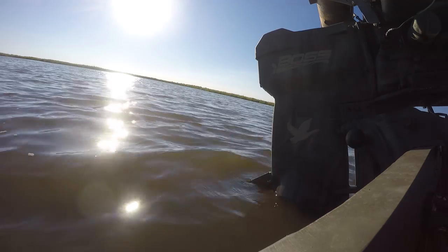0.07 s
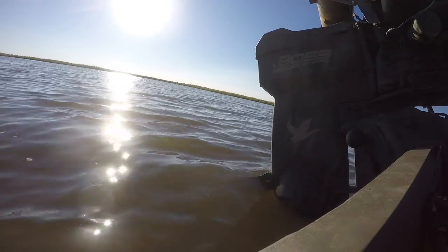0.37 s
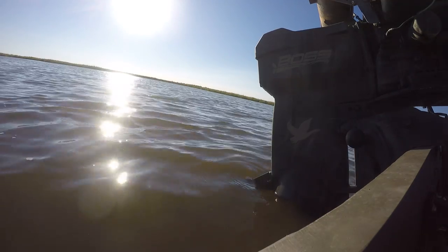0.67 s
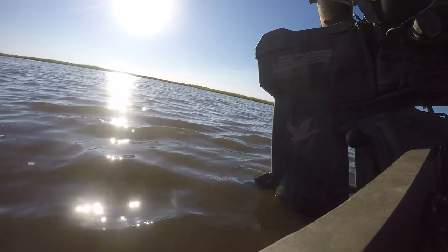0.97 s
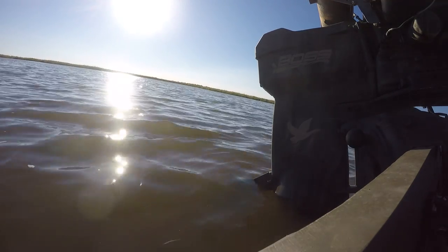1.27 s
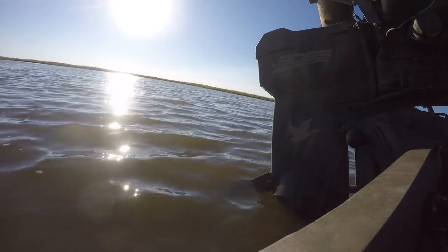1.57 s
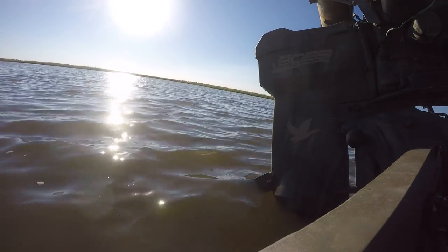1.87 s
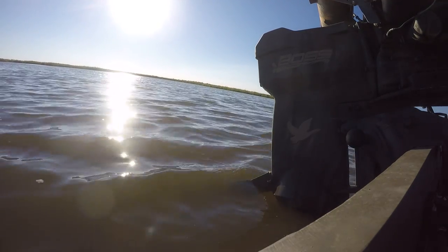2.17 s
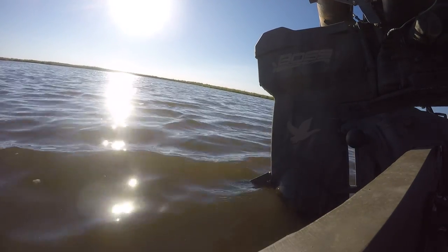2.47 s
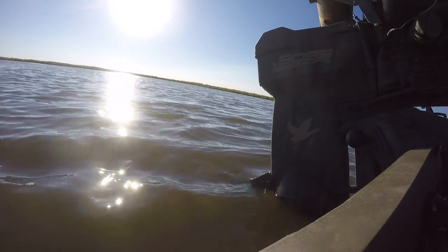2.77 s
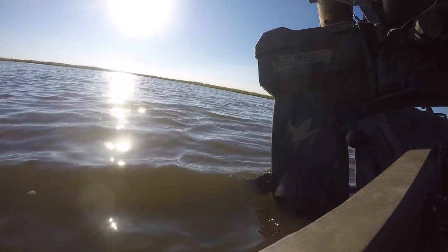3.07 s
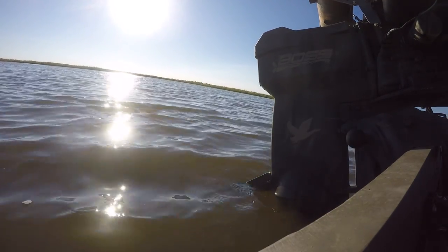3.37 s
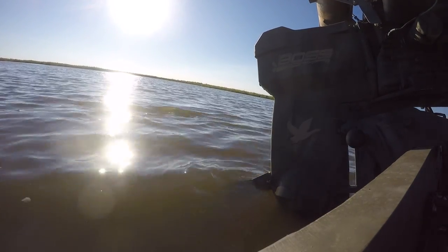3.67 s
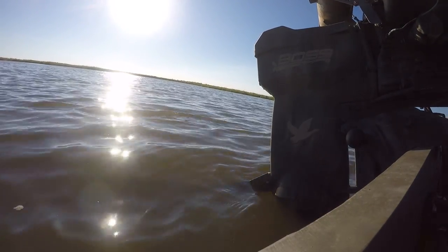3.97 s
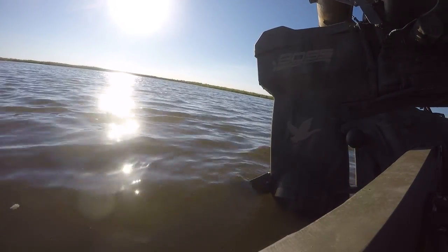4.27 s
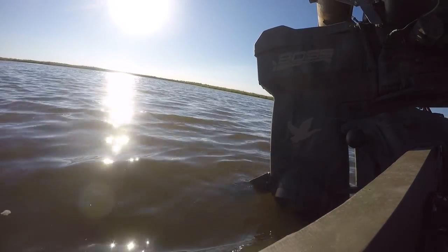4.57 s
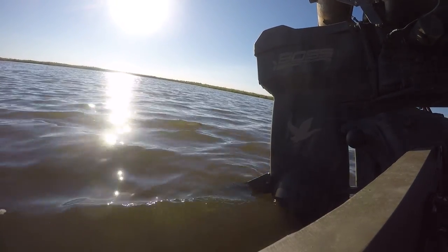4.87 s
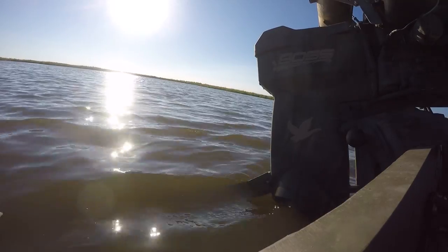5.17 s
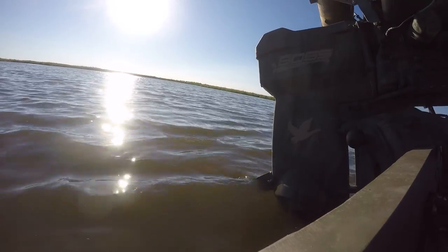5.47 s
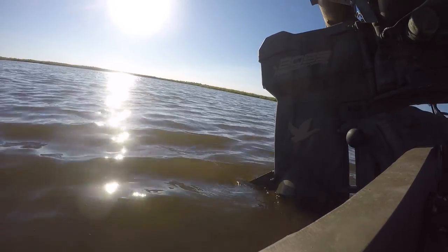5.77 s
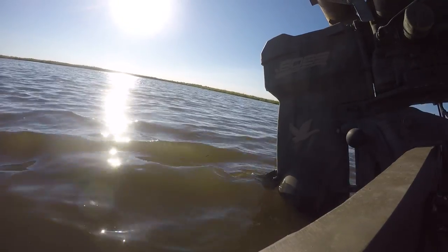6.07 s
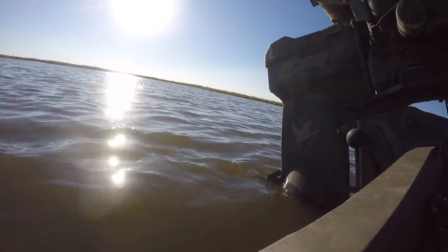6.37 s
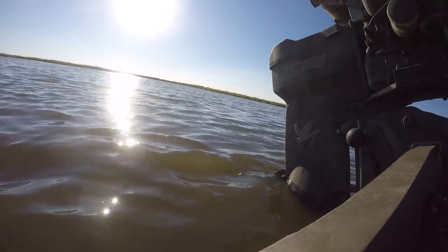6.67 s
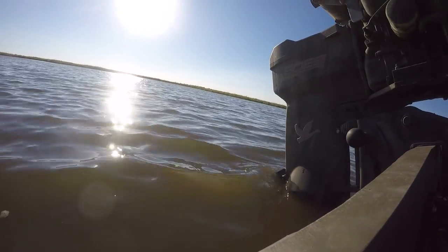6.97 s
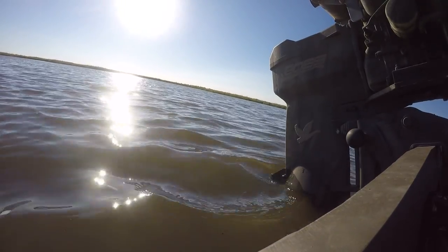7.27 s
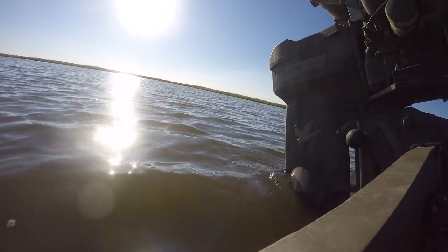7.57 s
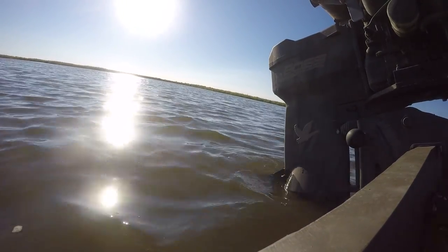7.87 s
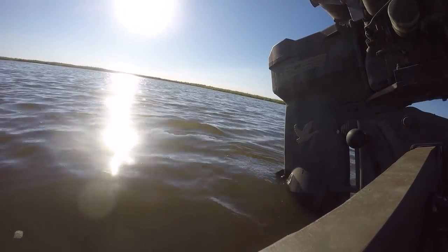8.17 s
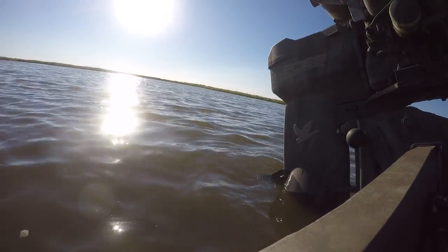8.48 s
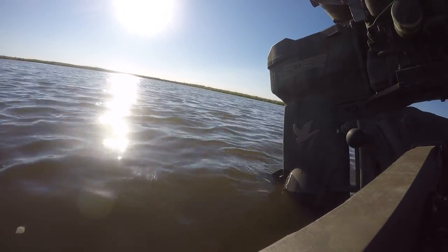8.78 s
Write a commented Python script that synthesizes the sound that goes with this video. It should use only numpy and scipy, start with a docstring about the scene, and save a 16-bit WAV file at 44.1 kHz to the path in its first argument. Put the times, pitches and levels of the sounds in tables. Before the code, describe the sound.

A small boat's motor cranks after a few clicks, catches, and idles with an uneven, booming, clattering chug.

```python
"""A V-twin mud motor starts up on a small boat in choppy water, heard from close by.
Over a low rumble, a switch and a lever click, with soft rubbing between. At 2.5 s the starter
bangs in and grinds round the flywheel for a second. At 3.6 s the engine catches and flares,
then idles in uneven double beats: a shaking boom, a ringing clatter, chirps of loose metal
and two exhaust chuffs a cycle, from 6.5 s on now and then a missed one."""
import sys
import numpy as np
from scipy import signal
from scipy.fft import rfft, irfft
from scipy.io import wavfile

SR = 44100
rng = np.random.default_rng(int(sys.argv[2]) if len(sys.argv) > 2 else 0)


def generate_wav(sig):
    """Save sig (samples, or channels by samples) to the path in sys.argv[1] as 16-bit PCM at SR."""
    pcm = np.round(np.clip(np.atleast_2d(sig).T, -1, 1) * 32767).astype(np.int16)
    wavfile.write(sys.argv[1], SR, pcm)


N = 397341
T = np.arange(N) / SR
ENGAGE_S, CATCH_S, RELEASE_S = 2.485, 3.575, 3.585  # starter meshes, engine catches, starter lets go

# resonances of engine, frame and hull: f/Hz, width/Hz, boost/dB
FRAME_MODES = [(449.7, 19, 16.5), (489, 21, 16), (710, 10, 4.5), (1002, 82, 7), (1183.5, 31, 9),
               (1529, 21, 9.5), (1651, 23, 9.5), (1723, 67, 6), (2242, 26, 12), (2416, 113, 9.5),
               (3555, 30, 10.5)]
# ring of the flywheel: f/Hz, width/Hz, boost/dB
FLYWHEEL_MODES = [(467, 43, 11), (544, 33, 5.5), (725, 18, 10), (1017, 49, 12.5), (1180, 45, 3.5),
                  (1476, 44, 3), (1613, 17, 12.5), (2270, 87, 7.5), (2430, 36, 13), (3400, 120, 3),
                  (4300, 41, 13)]
# spectrum of a heavy, dull blow: f/Hz, level/dB
BANG_EQ = [(40, -17), (110, 2), (200, 9), (330, 0), (470, 1), (700, -18), (1100, -7.5), (2300, -17),
           (4000, -43), (5500, -32), (6700, -26), (14000, -57)]
# blows of the starter pinion taking up the load: t/s, level/dB, decay/s
PINION_BLOWS = [(2.49, -5, 0.011), (2.516, -15.5, 0.04), (2.56, -15, 0.041), (2.605, -27, .05)]
# compression strokes that load the starter: t/s, extra grind/dB, dip of the hiss just after/dB
COMPRESSIONS = [(2.656, 7.002, 5), (2.789, 7.5, 12), (2.956, 8.002, 4), (3.058, 8.502, 15), (3.216, 8, 11),
                (3.308, 8, 2), (3.465, 7.5, 13), (3.58, 6, 3)]
# missed firings: t/s, loss of chuff/dB
MISSED_FIRINGS = [(6.55, 19), (7.04, 10), (7.16, 7), (7.41, 23), (7.65, 20), (8.38, 17), (8.63, 20),
                  (8.75, 10)]


def gain_of(db):
    """Decibels to amplitude."""
    return 10 ** (np.asarray(db) / 20)


def unit_rms(x):
    """Scales to rms 1."""
    return x / np.sqrt(np.mean(x ** 2) + 1e-20)


def curves(rows):
    """One automation curve for each column after the time."""
    s, *columns = np.transpose(rows)
    return [np.interp(T, s, c) for c in columns]


def hump(s, width):
    """A smooth rise and fall of height 1 around a moment."""
    return np.exp(-np.minimum(((T - s) / width) ** 2, 100))


def drift(hz, size=4096):
    """Random wander of rms 1, rolling off above the given rate."""
    rolloff = 1 + (np.fft.rfftfreq(size, T[-1] / size) / hz) ** 4
    slow = irfft(rfft(rng.standard_normal(size)) / rolloff)
    return np.interp(T, np.linspace(0, T[-1], size), unit_rms(slow))


def colour(x, eq, modes=(), size=8192):
    """Rings x through a body of unit energy: a broad EQ (f/Hz, level/dB) with resonances on top."""
    hz = np.fft.rfftfreq(size, 1 / SR)
    f, db = np.transpose(eq)
    gain = gain_of(np.interp(np.log(hz + 1), np.log(f), db)) * hz / np.hypot(hz, 20)
    peaks = sum((gain_of(boost) ** 2 - 1).clip(0) / (1 + (2 * (hz - centre) / width) ** 2)
                for centre, width, boost in modes)
    # minimum phase: the ring follows the hit
    cepstrum = irfft(np.log(gain * np.sqrt(1 + peaks) + 1e-6))
    cepstrum[1:size // 2] *= 2
    cepstrum[size // 2 + 1:] = 0
    ring = irfft(np.exp(rfft(cepstrum)))
    return signal.oaconvolve(x, ring / np.linalg.norm(ring))[:N]


def rattle(per_s, spread_db):
    """A stream of tiny impacts of uneven size, rms 1."""
    out = np.zeros(N)
    at = np.flatnonzero(rng.random(N) < per_s / SR)
    chance = rng.uniform(-1, 1, N)[at]
    out[at] = np.sign(chance) * gain_of(spread_db * np.minimum(-np.log(abs(chance)), 3))
    return unit_rms(out)


def bursts(times, dbs, rise, decay):
    """Envelope of hits, each with a linear attack and an exponential tail."""
    power = np.zeros(N)
    t = np.arange(SR // 4) / SR
    for s, db, fall in zip(times, dbs, decay * np.ones(len(times))):
        shape = np.minimum(t / rise, 1) * np.exp(-np.maximum(t - rise, 0) / fall)
        part = power[round(s * SR):][:len(t)]
        part += (gain_of(db) * shape[:len(part)]) ** 2
    return np.sqrt(power)


def water(onset_s=0.084):
    """A low bed of wind and small waves around the hull, with faint laps."""
    # swell of the rumble, with a lull before the start: t/s, level/dB
    swell = [(.1, -35), (.3, -33), (.7, -34.5), (1.3, -34.5), (1.75, -33.5), (2.15, -36), (2.45, -36)]
    # spectrum of the rumble: f/Hz, level/dB
    rumble_eq = [(12, -63), (20, -14), (43, 0), (53, -21.5), (64, -16), (124, -27), (155, -17.5),
                 (235, -31), (310, -30), (387, -42.5), (484, -35.5), (603, -53.5), (4430, -59.5),
                 (4950, -60.5), (15000, -73.5)]
    rumble = gain_of(curves(swell)[0] + 1.3 * drift(11)) * colour(rng.standard_normal(N), rumble_eq)
    lapping = gain_of(-67 + 1.8 * drift(11)) * rattle(700, 3)
    laps = colour(lapping, [(400, -19), (1000, 5), (2300, 6), (3200, -14), (8000, -25)])
    return np.clip((T - onset_s) / 0.0096, 0, 1) * (rumble + laps)


def swishes():
    """Soft, grainy rubbing that swells and fades."""
    # rubs before the start: middle t/s, length/s, level/dB
    rubs = [(.85, 0.078, -67), (1.042, 0.074, -61), (1.766, 0.37, -55)]
    rub_eq = [(500, -22), (1000, -1), (1800, 4), (2400, 3), (3000, -17), (4000, -13), (8000, -32)]
    level = sum(gain_of(db) / (1 + (2 * (T - s) / length) ** 8) for s, length, db in rubs)
    return colour(level * rattle(4000, 2.2), rub_eq)


def controls():
    """Bright switch snaps and duller latch clacks, each with a faint ring in the frame."""
    # clicks of switch and lever: t/s, level/dB, decay/s, dull share/0-1
    clicks = [(0.2346, -20.5, 0.0026, 0), (0.277, -39, 0.011, 0.1), (0.297, -36, 0.0066, 0.1),
              (0.305, -29, 0.0063, 0.3), (0.312, -30, 0.0078, 0), (0.349, -27, 0.0025, 0.44),
              (0.459, -43, 0.0053, 0.8), (1.321, -51, 0.0073, 0.8), (1.422, -44.5, 0.015, 1),
              (2.1218, -35, 0.0092, 0.74), (2.2475, -39.5, 0.0085, 1), (2.291, -30, 0.0072, 1),
              (2.307, -33.5, 0.015, 1), (2.35, -47, 0.02, 1), (2.461, -39, 0.054, 0.94),
              (2.4737, -16, 0.0096, 0.5), (2.480, -12, 0.01, 0.8)]
    # spectrum of the switch: f/Hz, level/dB
    switch_eq = [(300, -28), (500, -8), (1000, -12), (1650, -3), (2300, 5), (3000, -4), (4050, -1),
                 (6000, -19.5), (6860, -10), (7700, -19), (11000, -23), (15000, -33)]
    # spectrum of the latch: f/Hz, level/dB
    latch_eq = [(290, -10), (500, -26), (998, -10), (1170, -9.5), (1750, -7), (1990, -39), (2340, -6.5),
                (2930, -25), (3770, -13), (4550, -44), (12000, -62), (15600, -87), (22000, -120)]
    s, db, decay, dull = np.transpose(clicks)
    clean = np.exp(-(decay / 0.0071) ** 2)  # short clicks are one clean impact, longer ones scrape
    out = np.zeros(N)
    for share, eq in ((1 - dull, switch_eq), (dull, latch_eq)):
        level_db = db + 10 * np.log10(np.clip(share, 1e-4, 1))
        scrape_db = level_db + 10 * np.log10(1.001 - clean)
        force = bursts(s, scrape_db, .0003, decay) * rng.standard_normal(N)
        force[np.round(s * SR).astype(int)] += gain_of(level_db) * np.sqrt(clean * decay * SR / 2)
        out += colour(force, eq)
    ring = bursts(s, db - 20 + 10 * np.log10(decay / 0.0046), 0.00094, 0.022) * rng.standard_normal(N)
    ring_eq = [(150, 5), (450, -4), (900, -2), (2400, 3), (4000, -6), (9000, -23)]
    return out + colour(ring, ring_eq, FRAME_MODES)


def lever_bumps():
    """The lever thuds into the hull, and its first push sets the mount swaying."""
    # bumps against the hull: t/s, level/dB, decay/s
    bumps = [(0.306, -27.5, 0.003), (0.349, -47, 0.011), (0.459, -44, .012), (2.124, -49, 0.0073)]
    s, db, decay = np.transpose(bumps)
    thud = colour(bursts(s, db, 0.00099, decay) * rng.standard_normal(N), BANG_EQ, FRAME_MODES)
    sway = bursts([0.235], [-22], 0.023, 0.11) * np.sin(2 * np.pi * 39 * T)
    return thud + sway


def coasting():
    """A faint, rough tone rises a little and sinks away, likely the freed starter running down."""
    # glide of the tone: t/s, f/Hz, level/dB
    glide = [(3.6, 290.6, -40.5), (3.95, 299, -32.5), (4.45, 335, -34.5), (4.8, 300.6, -34),
             (6.0, 267, -39.5), (7.0, 253, -80)]
    hz, db = curves(glide)
    turns = np.cumsum(hz * (1 + .045 * drift(60))) / SR
    return (T > CATCH_S) * gain_of(db + 3 * drift(40)) * np.sin(2 * np.pi * turns)


def chirps(faint_from_s=5.6, repeats=4):
    """Loose metal rubs and sings for a moment, its pitch wavering."""
    # the loudest chirps: t/s, f/Hz, level/dB
    loud = [(3.597, 3670, -19), (3.698, 3250, -31), (3.748, 4000, -30), (3.868, 3850, -23),
            (3.972, 4000, -33), (4.033, 3460, -27), (4.18, 4000, -27.5), (4.242, 4300, -28.5),
            (7.23, 4800, -34), (7.283, 3710, -25)]
    # faint squeaks scattered over the idle: f/Hz, level/dB
    squeaks = [(4800, -42.5), (6550, -41.5)]
    out = np.zeros(N)
    wavering_t = T + 0.0125 * np.cumsum(drift(226)) / SR
    faint = [(s, hz, db) for hz, db in squeaks for s in rng.uniform(faint_from_s, T[-1], repeats)]
    for s, hz, db in loud + faint:
        out += gain_of(db) * hump(s, .013) * np.sin(2 * np.pi * hz * wavering_t)
    return out


def brush_hiss(engaged, speed, teeth, db_per_octave=27):
    """The starter's brushes hiss with speed, ducking as the flywheel runs ahead past each compression."""
    # spectrum of the brushes: f/Hz, level/dB
    brush_eq = [(2500, 4), (4300, 2.5), (5600, -7.5), (6550, 7), (7400, -6.5), (8600, -8.5), (10000, -16.5),
                (11200, -11), (11900, -19), (14500, -36), (15500, -48)]
    duck_db = sum(dip_db * hump(s + 0.022, 0.014) for s, _, dip_db in COMPRESSIONS)
    hiss_db = -30 + db_per_octave * np.log2(speed) - duck_db + 2.4 * drift(54)
    scrape = bursts([PINION_BLOWS[0][0]], [-19], .004, 0.0057)
    grain = rattle(5000, 2.2) + 0.34 * teeth
    return colour((engaged * gain_of(hiss_db) + scrape) * grain, brush_eq)


def pinion_bang():
    """The pinion slams into mesh and rings the flywheel."""
    s, db, decay = np.transpose(PINION_BLOWS)
    return colour(bursts(s, db, 0.004, decay) * rattle(3140, 2.2), BANG_EQ, FLYWHEEL_MODES)


def starter(start_hz=371, top_hz=751, spin_up_s=.15, strain_hz=680):
    """The pinion's teeth grind and whine round the flywheel, harder on each compression."""
    # spectrum of the gears: f/Hz, level/dB
    gear_eq = [(40, -13), (150, 7.5), (380, -1.5), (470, 4.5), (620, -8.5), (1300, 1.5), (2000, -5.5),
               (2450, -7.5), (2950, -17), (3800, -7), (5400, -61), (9000, -87)]
    since = np.maximum(T - ENGAGE_S, 0)
    engaged = np.minimum(since / 0.0055, 1) * np.exp(-np.maximum(T - RELEASE_S, 0) / 0.028)
    level = engaged * gain_of(-21 + 6 * np.exp(-since / 0.17))  # louder while it spins up
    load_db = sum(db * hump(s, .017) for s, db, _ in COMPRESSIONS)
    tooth_hz = top_hz + (start_hz - top_hz) * np.exp(-since / spin_up_s)
    tooth_count = np.cumsum(tooth_hz * (1 + .03 * drift(25))) / SR
    tooth_count += .07 * drift(220)  # play makes each tooth land a little early or late
    teeth = unit_rms(np.diff(np.floor(tooth_count), prepend=0) * (1 + 0.68 * drift(220)))
    grind = gain_of(-3.5) * teeth + gain_of(-2.7) * rattle(1700, 4)
    strain_band = signal.butter(2, [strain_hz, 3 * strain_hz], "bandpass", fs=SR, output="sos")
    strain = (gain_of(load_db) - 1) * signal.sosfilt(strain_band, grind + 0.32 * teeth)
    gears = colour(level * gain_of(2.1 * drift(57)) * (grind + strain), gear_eq, FLYWHEEL_MODES)
    brushes = brush_hiss(engaged, tooth_hz / top_hz, teeth)
    bang = pinion_bang()
    rocking_eq = [(15, -10), (30, -0.5), (45, -1.5), (60, -15), (90, -10.5), (140, -41), (400, -68)]
    rocking = level * gain_of(-3.5) * colour(rng.standard_normal(N), rocking_eq)
    whine = level * gain_of(-18.5 + 2.1 * load_db + 2.8 * drift(25)) * np.sin(2 * np.pi * tooth_count)
    return gears + whine + brushes + bang + rocking


def firings(cycles, v_lag=.385, flare_db=10, flare_s=0.46):
    """Two uneven firings a cycle: when each exhaust valve opens, and relative knock and chuff levels."""
    # how hard the firings knock: t/s, relative level/dB
    effort = [(3.58, -18), (3.7, -11), (3.9, -12), (4.25, -18), (4.8, -17), (5.15, -20), (5.6, -18),
              (6.6, -20.5), (6.92, -14), (7.1, -19), (7.4, -14.5), (7.7, -17), (8.15, -15), (8.68, -19),
              (8.95, -13.5)]
    whole = np.arange(int(cycles[-1]) + 1)
    places = np.sort(np.r_[whole, whole + v_lag])[1:]  # in cycles; the second cylinder starts
    opens = np.interp(places[places < cycles[-1]], cycles, T)
    knock_scatter, chuff_scatter = rng.standard_normal((len(opens), 2)).T
    knock_db = np.interp(opens, *np.transpose(effort)) + 1.4 * knock_scatter
    rich = np.exp(-((opens - CATCH_S) / flare_s) ** 2)  # the first, rich firings chuff louder
    chuff_db = -40 + flare_db * rich + 1.03 * chuff_scatter
    for s, loss_db in MISSED_FIRINGS:
        chuff_db[np.argmin(abs(opens - s))] -= loss_db
    return opens, knock_db, chuff_db


def jingle(shaking, parts=12):
    """Small loose parts, each with its own pitch, ping at random while the engine shakes them."""
    t = np.arange(SR // 24) / SR
    out = np.zeros(N + len(t))
    for hz in np.geomspace(3300, 4250, parts):
        ping = np.sin(2 * np.pi * hz * t) * np.exp(-t / .006)
        for at in rng.integers(0, N, size=220):
            out[at:at + len(t)] += shaking[at] * rng.standard_normal() * ping
    return unit_rms(out[:N])


def frame_clatter(opens, knock_db, running, knock_lead_s=0.028):
    """Each firing knocks the frame and sets the hull humming; valve gear and loose parts rattle along."""
    # hard clanks of the mount as the engine rocks: t/s, level/dB, decay/s
    mount_hits = [(3.598, -16, 0.023), (3.797, -14, 0.006), (3.838, -15, 0.0096), (4.217, -15, 0.0062),
                  (4.653, -22, 0.0047), (5.06, -20, 0.0037), (6.587, -16.5, 0.0082), (6.648, -20, 0.0077),
                  (7.275, -20.5, 0.0099), (7.323, -15, 0.015), (7.443, -16, .006), (7.522, -14, 0.013),
                  (7.683, -17, 0.0082), (7.746, -19.5, 0.007), (8.052, -14, 0.0072), (8.178, -8.5, 0.0051),
                  (8.355, -15, .004), (8.539, -11.5, 0.014), (8.789, -15.5, 0.0074), (8.973, -14.5, 0.0077)]
    # spectrum of the knocks and clanks: f/Hz, level/dB
    clatter_eq = [(60, -9), (130, 0), (300, -3), (520, 1.5), (740, -5), (1000, -1), (1700, -1.5),
                  (2400, -5.5), (2900, -13.5), (3900, -13), (5400, -33.5), (6700, -41), (9000, -54),
                  (15000, -46)]
    # spectrum of the valve gear: f/Hz, level/dB
    whirr_eq = [(60, -29), (150, 5), (400, 3.5), (750, -2), (1200, 1), (2300, -3), (2950, -13), (3600, -3),
                (4200, -9), (5500, -26), (6600, -18), (8000, -25.5), (15000, -67)]
    knocks = bursts(opens - knock_lead_s, knock_db - 3, 0.016, 0.021)
    s, db, decay = np.transpose(mount_hits)
    clanks = bursts(s, db, 0.00022, decay) * rng.standard_normal(N)
    clatter = colour(knocks * rattle(3200, 2.5) + clanks, clatter_eq, FRAME_MODES)
    hull_eq = [(300, -52), (420, -19.5), (465, -8), (495, -13.5), (540, -23), (700, -56)]
    hull_drive = bursts(opens - .015, knock_db - 8, 0.0057, 0.034) * rng.standard_normal(N)
    hum = colour(hull_drive, hull_eq, FRAME_MODES)
    first_cylinder = opens[1::2]
    tappets = bursts(first_cylinder - knock_lead_s, np.full(len(first_cylinder), -30), 0.0013, 0.0026)
    valve_gear = gain_of(-30 + 2.54 * drift(39)) * running + tappets
    whirr = colour(valve_gear * rattle(2000, 2.7), whirr_eq, FRAME_MODES)
    pings = gain_of(-42) * jingle(running * (0.077 + knocks))
    return clatter + hum + whirr + pings


def chuffs(opens, chuff_db, variants=7, eq_scatter_db=3):
    """Gas spits through the outlet; the puffs rotate through variants of colour and whistle."""
    # spectrum of the jet: f/Hz, level/dB
    jet_eq = [(1500, 15.5), (3000, 14.5), (4000, 24.5), (5600, -8), (6600, 5), (7800, 7), (9500, 2),
              (11800, -2), (13000, 11.5), (14000, -24), (15500, -38)]
    # steady whistles of the outlet: f/Hz, width/Hz, boost/dB
    outlet_modes = [(5060, 23, 19), (6380, 61, 12.6), (6690, 57, 16.3), (7270, 60, 11.3), (13300, 110, 1.8)]
    out = np.zeros(N)
    jet = rattle(9000, 3.1)
    for k in range(variants):
        whistles = [(hz, 110, 11) for hz in rng.uniform(6000, 15000, 9)]
        eq = [(hz, db + eq_scatter_db * rng.uniform(-1, 1)) for hz, db in jet_eq]
        puffs = bursts(opens[k::variants] - .002, chuff_db[k::variants] + 6.4, 0.0069, 0.019)
        out += colour(puffs * jet, eq, outlet_modes + whistles)
    return out


def thumps(times, dbs, hz=68.7, decay_s=0.0092):
    """Each gas pulse briefly rings a low, damped resonance of the muffler."""
    t = np.arange(SR // 8) / SR
    pulses = np.zeros(N + SR)
    pulses[np.round(times * SR).astype(int)] = gain_of(dbs + 1.2 * rng.standard_normal(len(times)))
    ring = np.sin(2 * np.pi * hz * t) * np.exp(-t / decay_s) * (1 - np.exp(-t / 0.0035))
    return signal.oaconvolve(pulses, ring)[:N]


def exhaust(opens, chuff_db):
    """Each opening valve gives a chuff, a pop and a thump in the muffler."""
    hiss = chuffs(opens, chuff_db)
    pops = bursts(opens + 0.0076, .5 * chuff_db - 7.5, 0.00078, 0.0054) * rng.standard_normal(N)
    pop_eq = [(70, -24.5), (150, 7), (300, 6), (600, -26.5), (2000, -23.5)]
    return hiss + colour(pops, pop_eq) + thumps(opens + 0.0094, .5 * chuff_db + 10)


def shake(cycles, stumble_db=13):
    """The pistons shake the mount four times a cycle; the boom dips about a cycle after each misfire."""
    # strength of the shaking: t/s, relative level/dB
    boom = [(3.58, -16.5), (3.82, -12.5), (4.3, -13.5), (4.62, -21), (4.7, -10.5), (5.2, -15), (5.5, -12),
            (6.6, -15), (7.45, -13.5), (9.0, -13.5)]
    stumbles = sum(hump(s + 0.15, 0.025) for s, _ in MISSED_FIRINGS)
    level_db = curves(boom)[0] + 3.67 - stumble_db * stumbles + 0.98 * drift(14)
    return gain_of(level_db) * np.cos(2 * np.pi * (4 * cycles + 1 / 8))


def engine():
    """One crankshaft drives the knocks, the exhaust and the shaking."""
    # engine speed, flaring at the catch, then settling: t/s, four-stroke cycle rate/Hz
    speed = [(3.512, 4.38), (3.83, 9.371), (4.5, 10.212), (4.58, 9.499), (5.11, 8.724), (6.17, 8.981),
             (6.55, 8.001), (7.04, 8.516), (7.14, 7.457), (7.34, 8.367), (8.22, 8.12), (9.0, 8.016)]
    cycles = np.cumsum(curves(speed)[0] * (T >= speed[0][0])) / SR
    opens, knock_db, chuff_db = firings(cycles)
    running = np.clip((T - CATCH_S) / 0.029, 0, 1)
    return frame_clatter(opens, knock_db, running) + exhaust(opens, chuff_db) + running * shake(cycles)


def scene():
    """A dry mono mix: open water has no room."""
    boat = water() + swishes() + controls() + lever_bumps()
    return (boat + starter() + coasting() + engine() + chirps())[None]


def record(dry):
    """Trims the subsonics, soft-clips peaks near full scale and cuts the very top."""
    dry = signal.sosfilt(signal.butter(1, 3, "highpass", fs=SR, output="sos"), dry)
    rounded = dry / (1 + dry ** 8) ** (1 / 8)
    lowpass = signal.firwin(511, 15450, window=("kaiser", 9), fs=SR)
    return signal.oaconvolve(rounded, lowpass[None], "same")


dry = scene()
out = record(dry)
generate_wav(out)
```